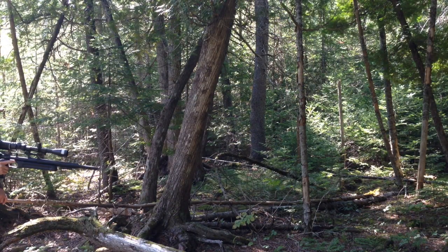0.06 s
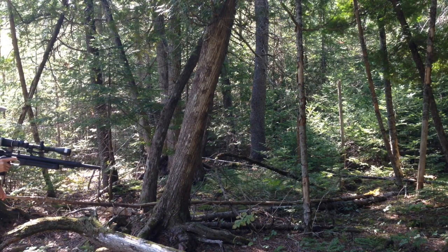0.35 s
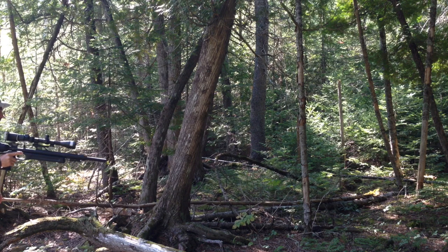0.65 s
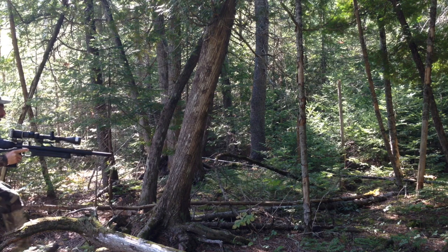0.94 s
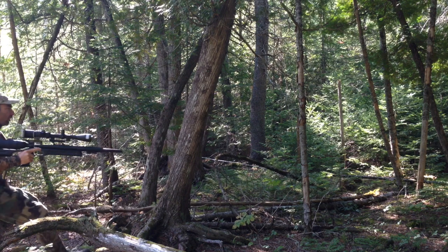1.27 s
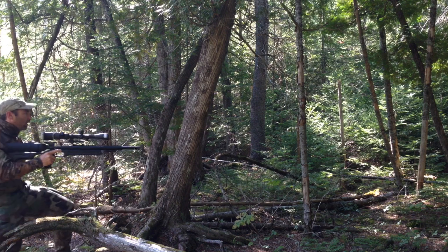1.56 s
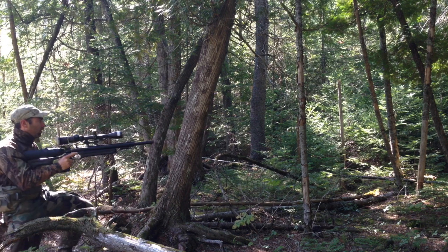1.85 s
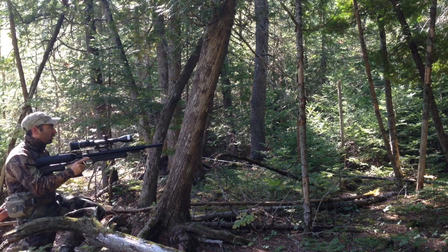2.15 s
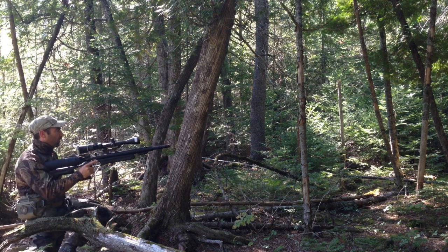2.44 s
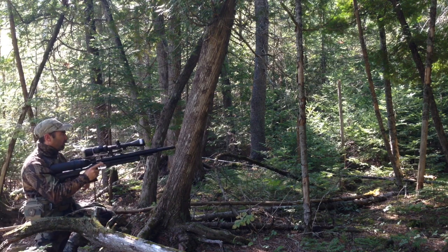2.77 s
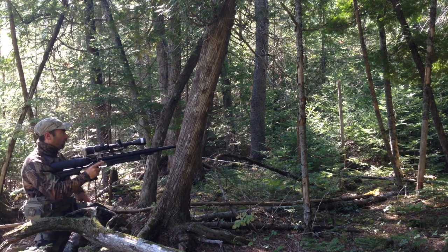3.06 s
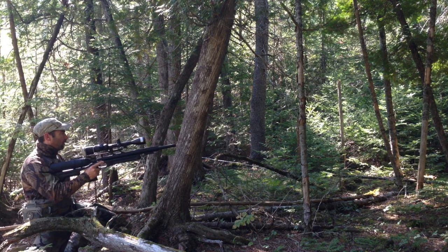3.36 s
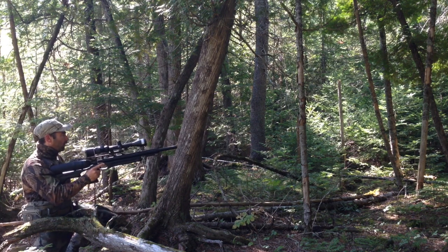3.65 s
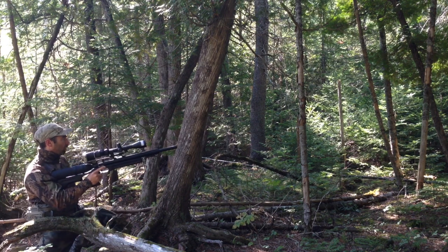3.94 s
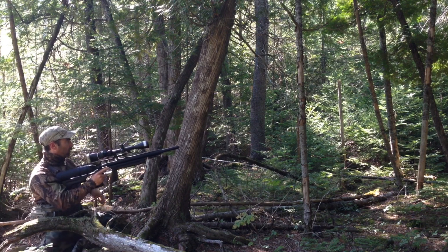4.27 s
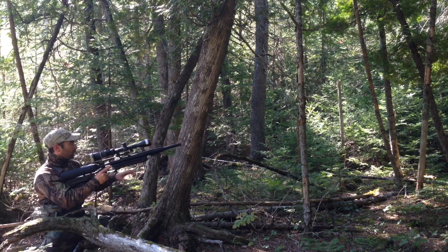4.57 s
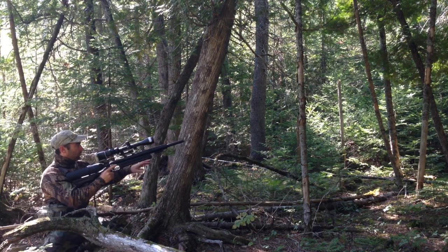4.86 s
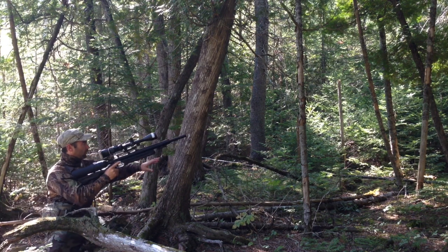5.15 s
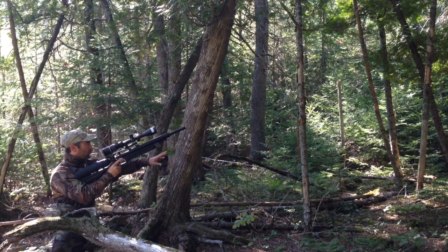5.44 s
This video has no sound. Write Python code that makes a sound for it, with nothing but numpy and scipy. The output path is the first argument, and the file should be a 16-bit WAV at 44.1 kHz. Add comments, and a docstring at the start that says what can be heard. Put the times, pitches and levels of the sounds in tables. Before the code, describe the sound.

A person creeps over a dry forest floor a few metres away, with a faint hiss and a far cricket chorus throughout. In the first half second, twigs snap sharply and boots knock on dead branches, with soft thuds on the soil. From about 0.6 to 2 seconds there is only rustling clothing, small ticks and a press of dry leaves near 1.4 seconds. A loud twig crack comes at about 2.2 seconds, followed by a sole scraping on bark and uneven snaps, with wooden knocks near 2.7, 2.9 and 3.6 seconds. Between 4.2 and 4.7 seconds, a quick cluster of hollow knocks and cracks sounds over a dragging scrape. The movement then softens to leaf and cloth rustle, with a few small snaps around 5.1 to 5.3 seconds as the person settles. The trees give each crack a slight, short echo.

```python
"""Twigs snap by brittle fracture as someone creeps over a dry forest floor and settles behind a log
a few metres away. Each crack is an impulse that scatters off the trunks. Dead branches ring in their
bending modes when a boot knocks them, and scrape under it by stick-slip friction. Soft soil thuds,
leaf litter crackles and clothing rustles. Far crickets and a faint hiss fill the wood."""
import sys
import numpy as np
from scipy import signal
from scipy.fft import rfft, irfft
from scipy.io import wavfile

SR = 44100
rng = np.random.default_rng(int(sys.argv[2]) if len(sys.argv) > 2 else 0)


def generate_wav(signal):
    """Clip the signal to [-1, 1] and save it as 16-bit WAV at the path in sys.argv[1]."""
    frames = np.transpose(np.atleast_2d(signal))
    scaled = np.clip(frames, -1, 1) * 32767
    pcm = np.round(scaled).astype(np.int16)
    wavfile.write(sys.argv[1], SR, pcm)


N = 251811
SIZE = 8192  # samples in a short sound or a filter
TIME, AGE = np.arange(N) / SR, np.arange(SIZE) / SR
BIN_HZ = np.maximum(np.arange(SIZE // 2 + 1) * SR / SIZE, 1)


def undb(db):
    """Decibels to amplitude ratio."""
    return 10 ** (np.asarray(db) / 20)


def unit(x):
    """Normalisation to rms 1."""
    return x / np.sqrt(np.mean(x ** 2))


def burst(x, seconds):
    """Normalisation to the energy of rms 1 held for so many seconds."""
    return x * np.sqrt(seconds * SR / np.sum(x ** 2))


def add(out, start_s, x):
    """Superposition of x on out from start_s."""
    i = max(int(start_s * SR), 0)
    out[i:i + len(x)] += x[:len(out) - i]


def spectrum(points):
    """Interpolation of dB at every bin, on a log-frequency axis."""
    hz, db = np.transpose(points)
    return np.interp(np.log(BIN_HZ), np.log(hz), db)


def hump(hz, octaves):
    """Resonance curve in dB."""
    return -12 * np.log10(1 + (np.log2(BIN_HZ / hz) / octaves) ** 2)


def colour(x, db):
    """Minimum-phase filter with the given dB at every bin."""
    cepstrum = irfft(np.log(undb(db)))
    cepstrum[1:SIZE // 2] *= 2
    cepstrum[SIZE // 2 + 1:] = 0
    return signal.fftconvolve(x, irfft(np.exp(rfft(cepstrum))))[:len(x)]


def noise(db, size=N):
    """Filtered Gaussian noise of rms 1."""
    return unit(colour(rng.standard_normal(size), db))


def fade(t60):
    """Exponential decay, 60 dB down after t60 seconds."""
    return undb(-60 * AGE / t60)


def wander(rate_hz):
    """Slow random modulation with a spread near 1."""
    return np.interp(TIME * rate_hz, np.arange(4096), rng.standard_normal(4096))


def grains(per_s, spread_db, size):
    """Poisson process: random clicks of uneven strength."""
    strength = undb(spread_db * np.minimum(rng.exponential(size=size), 4))
    return (rng.random(size) < per_s / SR) * strength * rng.choice([-1, 1], size)


def ringing(modes, uneven_db, detune):
    """Free vibration: damped modes of alternating sign, their strength and pitch varying by blow."""
    out = np.zeros(SIZE)
    for k, (hz, db, t60) in enumerate(modes):
        strength, shift = rng.standard_normal(2)
        mode = np.sin(2 * np.pi * hz * (1 + detune * shift) * AGE)
        out += (-1) ** k * undb(db + uneven_db * strength) * fade(t60) * mode
    return out


# Spectrum of the forest air: frequency_hz, level_db
AIR_SPECTRUM = [(20, -19), (45, -8.5), (90, 0), (150, 2.5), (200, 2), (430, -2.5), (700, -7.5), (1500, -10),
                (2300, -6), (2850, -11.5), (3700, -1), (5500, -1.5), (9000, -3.5), (12000, -10),
                (15000, -12)]


def air(level_db=-52):
    """Broadband noise: a faint hiss whose level drifts a little."""
    return noise(spectrum(AIR_SPECTRUM)) * undb(level_db + 1.4 * wander(3.03))


# Spectrum of the cricket chorus: frequency_hz, level_db
CRICKET_SPECTRUM = [(2000, -49), (2900, -13.5), (3080, 6), (3320, 6), (3480, 2.5), (3800, -6),
                    (5000, -37.5)]


def crickets(level_db=-55, trill_hz=44):
    """Incoherent summation: many far crickets blur into one shimmering band."""
    chorus = noise(spectrum(CRICKET_SPECTRUM))
    trill = 1 + 0.16 * np.sin(2 * np.pi * np.cumsum(trill_hz + wander(2.69)) / SR)
    return undb(level_db + wander(6)) * chorus * trill


def deep_wood(near, level_db=-21, t60=0.25):
    """Reverberation: the farther trees return a faint, diffuse copy of the near sounds."""
    response = rng.standard_normal(SIZE) * fade(t60) * (1 - np.exp(-AGE / 0.0077))
    return undb(level_db) * signal.fftconvolve(near, burst(response, 1 / SR))[:N]


SWELL_DB = 11.5  # rise over one attack time, fall over one release time


def load_power(events):
    """Addition of powers: each load swells as the weight comes on and dies away as it leaves."""
    return sum(undb(db - SWELL_DB * np.maximum((s - TIME) / attack, (TIME - s) / release)) ** 2
               for s, db, attack, release in events)


# A boot or knee pressing the litter: peak_s, level_db, attack_s, release_s
LITTER_PRESSES = [(.19, -43.5, .08, .1), (.38, -47.5, .06, .09), (.51, -44, .04, .15),
                  (1.365, -39.5, .11, .06), (1.49, -48.5, .03, .07), (1.93, -49, .04, .08),
                  (2.1, -44.5, .06, .08), (2.21, -43.5, .04, .13), (2.57, -43.5, .11, .17),
                  (2.86, -47.5, .12, .17), (3.215, -41.5, .02, .12), (3.33, -47, .08, .17),
                  (3.62, -47.5, .08, .12), (3.77, -47, .07, .09), (4.09, -50.5, .1, .12),
                  (4.33, -47, .05, .03), (4.48, -41, 0.046, .05), (5.14, -46.5, .08, .16),
                  (5.3, -46.5, .14, .17), (5.52, -45.5, .06, .04)]
# A sole dragging over dead wood: peak_s, level_db, attack_s, release_s
SOLE_DRAGS = [(.22, -55, 0.27, 0.15), (.51, -51, .03, .06), (2.49, -50, 0.14, 0.22),
              (2.66, -50, 0.15, 0.085), (3.77, -53.5, 0.12, 0.16), (4.43, -50, 0.41, 0.26),
              (4.64, -55, 0.13, 0.48), (5.33, -54, .12, 0.17)]


def movement(cloth_db=-51.5, still_s=5.53, settle_s=0.04, sole_db=-16.5):
    """Level envelopes of rustle and scrape in dB: clothes brush until still_s; all movement scrapes."""
    cloth = undb(cloth_db - SWELL_DB * np.clip((TIME - still_s) / settle_s, 0, 1)) ** 2
    leaves = cloth + load_power(LITTER_PRESSES)
    soles = undb(sole_db) ** 2 * leaves + load_power(SOLE_DRAGS)
    return 10 * np.log10(leaves), 10 * np.log10(soles)


# Spectrum of dry leaves and cloth: frequency_hz, level_db
LEAF_SPECTRUM = [(200, -7), (1200, -13), (2600, -3), (4200, 0.5), (5600, -1), (8500, -3), (10500, -6.5),
                 (12000, -9), (15000, -20.5)]


def litter(leaves_db, crackle_db=-4, brush_db=-2):
    """Microfracture: each size of leaf crackles at its own pitch, over the brush of cloth and needles."""
    tone = spectrum(LEAF_SPECTRUM)
    crackle = sum(unit(colour(grains(330, 4.9, N), tone + hump(hz, 0.25))) for hz in (4000, 6200, 8600))
    brush = noise(tone) * undb(1.2 * wander(70))
    crush_db = np.minimum(0.33 * (leaves_db + 46), 0)  # weight brings out the crackle
    return (undb(crackle_db + crush_db) * unit(crackle) + undb(brush_db) * brush) * undb(leaves_db)


# Weight landing on soft soil: start_s, level_db, pitch_hz, t60_s
SOIL_THUDS = [(0.032, -48.5, 292.4, 0.23), (0.263, -47, 147, 0.36), (0.484, -55, 298, 0.023),
              (.512, -50.5, 146, 0.12), (2.914, -57, 235, 0.062), (3.57, -49.5, 252, .05),
              (4.598, -54, 212, 0.033), (5.316, -56, 158, 0.1)]


def thuds():
    """Damped oscillation: the springy soil answers a footfall with a short low note."""
    out = np.zeros(N)
    for start_s, db, hz, t60 in SOIL_THUDS:
        soil = np.sin(2 * np.pi * hz * AGE) + 0.81 * noise(2 * hump(hz, 0.37), SIZE)
        envelope = fade(t60) * (1 - np.exp(-AGE / 0.0016))
        add(out, start_s, undb(db) * burst(soil * envelope, 0.033))
    return out


# Modes of a dead branch, scraped or knocked: pitch_hz, level_db, t60_s
BRANCH_MODES = [(285, -6.5, 0.078), (429.5, -8, 0.064), (562, -8.5, 0.1), (680, -4, 0.034), (858, 1, 0.045),
                (952, -3, 0.054), (1208, -11, 0.078), (1318, -6, 0.041), (1475, -13.5, 0.057),
                (1646, -2, 0.03), (1831, -10.5, 0.068), (2085, -2.5, 0.057), (2428, -9, 0.055)]
# Spectrum of a sole rubbing bark: frequency_hz, level_db
BARK_SPECTRUM = [(120, -11), (300, -7), (550, -3), (850, -6.5), (1150, -2), (1700, -3.5), (2400, -7),
                 (3500, -36), (8000, -55)]


def scraping(scrape_db, slips_per_s=700, gain_db=-3):
    """Stick-slip friction: the harder a sole presses on bark, the more the branch rings hollow."""
    slips = grains(slips_per_s, 4.0, N) + 0.17 * rng.standard_normal(N)
    friction = colour(slips, spectrum(BARK_SPECTRUM))
    branch = ringing(BRANCH_MODES, uneven_db=0.56, detune=0.057)
    hollow = colour(signal.fftconvolve(friction, branch)[:N], hump(830, 0.41))
    hollow_db = -1 + 1.26 * (scrape_db + 51)
    return (unit(friction) + undb(hollow_db) * unit(hollow)) * undb(scrape_db + gain_db)


def disperse(x, travel_s, fastest_hz=2000):
    """Bending-wave dispersion: travel time goes as 1 / sqrt(frequency) and is travel_s at 1 kHz."""
    hz = np.minimum(BIN_HZ, fastest_hz)
    # delay is counted from the arrival of the fastest wave
    cycles = travel_s * (2 * np.sqrt(1000 * hz) - hz * np.sqrt(1000 / fastest_hz))
    return irfft(rfft(x) * np.exp(-2j * np.pi * cycles))


# Boots striking dead branches: start_s, level_db, centre_hz, travel_s, ring_time_ratio
BRANCH_KNOCKS = [(0.0205,-39,1410,0.0037,1.8), (0.032,-29,1340,.003,1.3), (.035,-33,1080,.004,0.83),
                 (0.0476,-36.5,1220,.003,.53), (0.206,-26.5,1300,0.0068,1.2), (0.2432,-29.5,1070,.004,1.05),
                 (.2545,-30.5,865,.004,0.96), (0.4808,-43,560,0.0023,0.28), (2.158,-46.5,510,0.0013,0.15),
                 (2.538,-44,800,0.00393,2.5), (2.56,-40.5,1000,.003,0.37), (2.579,-40,1410,.003,1.1),
                 (2.624,-41,550,.004,1.6), (2.7356,-29.5,1360,0.0042,.62), (2.9127,-29,1020,.006,0.62),
                 (3.2197,-42,980,.0045,0.64), (3.566,-26,1040,0.0058,0.63), (3.934,-45,1540,0.0014,.7),
                 (4.13,-45,1110,0.0027,1.6), (4.2384,-42.5,810,0.0019,0.18), (4.32,-33.5,1340,0.0015,1.2),
                 (4.325,-29.5,1830,0.00193,1.05), (4.3309,-30.5,900,0.002,0.62),
                 (4.3806,-37.5,746,.0023,0.35), (4.4238,-36.5,880,.0018,0.9),
                 (4.462,-29.5,1060,0.00134,0.64), (4.477,-34.5,1450,0.0021,1),
                 (4.5225,-39.5,860,0.0018,0.34), (4.5573,-44.5,800,.0028,1.1),
                 (4.5964,-29.5,550,0.00064,0.45), (4.628,-49,650,0.0015,0.36), (4.682,-54,850,0.00166,.9),
                 (4.701,-46,1000,0.0019,1.5)]


def knocks(contact_db=-4.5):
    """Impact excitation: a struck branch rings and rattles, more briefly when it is pinned down."""
    out = np.zeros(N)
    contact_tone = spectrum([(80, -28.5), (230, -4), (700, -9.5), (1800, -5), (2700, -15), (6000, -26.5)])
    wood_tone = spectrum([(1850, 4), (2900, -6.5), (6000, -21)])
    for start_s, db, centre_hz, travel_s, ring_ratio in BRANCH_KNOCKS:
        ring_ratio = max(ring_ratio, 0.2)
        modes = [(hz, mode_db, t60 * ring_ratio) for hz, mode_db, t60 in BRANCH_MODES]
        ring = burst(ringing(modes, uneven_db=4, detune=0.014), 0.88)
        contact = 0.19 * grains(2500, 3.6, SIZE) * fade(0.082 * ring_ratio)  # rattle on its neighbours
        contact[0] += 1  # the blow itself
        contact = burst(colour(contact, contact_tone), 0.84)
        wood = colour(ring + undb(contact_db) * contact, hump(centre_hz, 0.63) + wood_tone)
        add(out, start_s, undb(db) * burst(disperse(wood, travel_s), 0.0093))
    return out


GIVE_S = 0.005  # how long the fibres give before a twig breaks
# Spectrum of breaking wood: frequency_hz, level_db
CRACK_SPECTRUM = [(300, -22), (1200, 1), (2000, 3), (3000, 2), (4400, 5), (5500, -1.5), (8300, 3),
                  (10200, -1.5), (11500, -7.5), (15000, -8)]


def snap(centre_hz, octaves, scatter_db, fibre_db=-15, ring_db=-7, ring_t60=0.0047, trunks_t60=0.12):
    """Brittle fracture: fibres give, the twig breaks, its halves ring and trunks scatter the crack."""
    tone = spectrum(CRACK_SPECTRUM) + hump(centre_hz, max(octaves, 0.04))
    fracture = rng.standard_normal(SIZE) * (0.38 * fade(0.0027) + 0.013 * fade(0.013))  # tearing
    fracture[0] += 1  # the break, followed by two quick steps as the wood parts
    fracture[(rng.random(2) * 0.0015 * SR).astype(int)] += 0.56
    modes = [(centre_hz * ratio, 0, ring_t60) for ratio in (0.62, 0.96, 1.05, 1.35)]
    halves = burst(colour(ringing(modes, uneven_db=5.2, detune=0.066), tone), 0.68)
    direct = burst(burst(colour(fracture, tone), 0.75) + undb(ring_db) * halves, 0.002)
    echoes = grains(3500, 1.7, SIZE) + 1.1 * rng.standard_normal(SIZE)
    echoes *= fade(trunks_t60) * (1 - np.exp(-AGE / 0.00012))
    crack = direct + undb(scatter_db) * burst(colour(echoes, tone), 0.0029)
    creak = 0.93 * noise(tone, SIZE) * fade(0.0033)
    out = np.concatenate([creak[:int(GIVE_S * SR)][::-1], crack])  # reversed, it swells into the break
    add(out, GIVE_S * rng.random() / 2, undb(fibre_db) * direct)  # the first fibre lets go early
    return out


def tiny_twigs(leaves_db, count=24, above_leaves_db=8, loudest_db=-38):
    """Fracture under load: tiny twigs break at random, more often and louder under heavier presses."""
    out = np.zeros(N)
    work = np.cumsum(undb(leaves_db) ** 2)
    moments = np.interp((np.arange(count) + rng.random(count)) / count, work / work[-1], TIME)
    for break_s, (size, pitch) in zip(moments, rng.standard_normal((count, 2))):
        db = min(np.interp(break_s, TIME, leaves_db) + above_leaves_db + 2.5 * size, loudest_db)
        centre_hz = 7040 * 2 ** (0.204 * pitch)
        add(out, break_s - GIVE_S, undb(db) * snap(centre_hz, octaves=0.35, scatter_db=-9))
    return out


# Twigs breaking underfoot: break_s, level_db, centre_hz, width_octaves, scatter_db
TWIG_SNAPS = [(0.025,-36,4400,0.093,-2), (0.033,-27.5,4800,0.45,-4.5), (.047,-32.5,6000,.46,-10),
              (.2092,-27.5,7100,.53,-3.5), (0.2109,-19,4400,.035,-15), (.2552,-28.5,4700,.38,-8),
              (.3445,-29,6830,0.47,-4), (0.3766,-34,6870,.2,-9), (.3948,-35,5900,.76,-5),
              (0.4775,-34,6000,0.9,-15), (0.4816,-21.5,6700,0.3,-17), (0.4833,-26,5000,1,-1),
              (0.896,-33.5,7400,0.26,-13), (.93,-34,5040,0.82,-9), (1.279,-32.5,5500,.5,-14),
              (1.3614,-34,5400,0.17,1.5), (1.7303,-39.5,2350,0.14,-4), (2.1585,-18,6450,0.48,-2.5),
              (2.1582,-21,2640,.17,-3), (2.1861,-28.5,3970,1,-8), (2.3387,-36,4400,0.17,-23),
              (2.5927,-22.5,7130,0.23,-29), (2.6114,-34,4330,.3,-9), (2.6807,-27,10000,.5,-15),
              (2.7384,-30,6600,0.72,-19), (2.743,-27.5,7600,0.61,-22), (2.8136,-36.5,7500,.42,-14),
              (2.8538,-36.5,7000,0.45,-13), (2.9168,-23,6400,0.58,-13), (2.997,-25.5,8440,0.19,-16),
              (3.168,-37,8200,0.41,-9), (3.2014,-28.5,9450,0.47,-4.5), (3.2392,-34,7000,0.48,-16),
              (3.314,-28,7900,0.43,-10), (3.335,-26,9430,0.12,-18), (3.569,-27,5750,0.32,-4),
              (3.5768,-33,5400,.27,-25), (3.6495,-28.5,6670,.33,-13), (3.6646,-33.5,7700,.7,-2),
              (3.728,-33,6760,0.28,-2), (3.776,-35.5,7140,.26,0.5), (3.9344,-35,5200,0.23,-10),
              (4.0232,-29,5960,0.58,-4), (4.2395,-26.5,5940,0.34,-3), (4.3239,-35,5260,0.36,7.5),
              (4.331,-31,4900,.48,-11), (4.3821,-32.5,5900,0.48,-2.5), (4.4247,-35,5200,0.51,-2),
              (4.4643,-34.5,4670,.4,1.5), (4.478,-33.5,5260,.5,1), (4.4913,-29.5,5900,.27,-23),
              (4.5973,-27.5,6270,0.19,-2), (4.863,-39,5560,.49,-9), (5.1286,-33,6350,0.42,-8),
              (5.316,-29.5,9500,0.21,-25), (5.3267,-30.5,6760,.4,-7)]


def twigs(first_fibre_db=-41.5):
    """Progressive failure: the first fibre to break is about equally loud whatever the twig's size."""
    out = np.zeros(N)
    for break_s, db, centre_hz, octaves, scatter_db in TWIG_SNAPS:
        crack = snap(centre_hz, octaves, scatter_db, fibre_db=min(first_fibre_db - db, -11))
        add(out, break_s - GIVE_S, undb(db) * crack)
    return out


def scene():
    """Superposition of the walk, its reverberation and the forest around, in one channel."""
    background = air() + crickets()
    leaves_db, scrape_db = movement()
    near = litter(leaves_db) + scraping(scrape_db) + tiny_twigs(leaves_db) + twigs() + knocks() + thuds()
    return (background + deep_wood(near) + near)[None]


def record(dry, bass_hz=36, top_hz=15350):
    """Band limiting: the deep bass rolls off and the top is cut steeply."""
    thinned = signal.sosfilt(signal.butter(3, bass_hz, "high", fs=SR, output="sos"), dry)
    return signal.sosfilt(signal.ellip(12, 0.1, 70, top_hz, fs=SR, output="sos"), thinned)


dry = scene()
out = record(dry)
generate_wav(out)
```